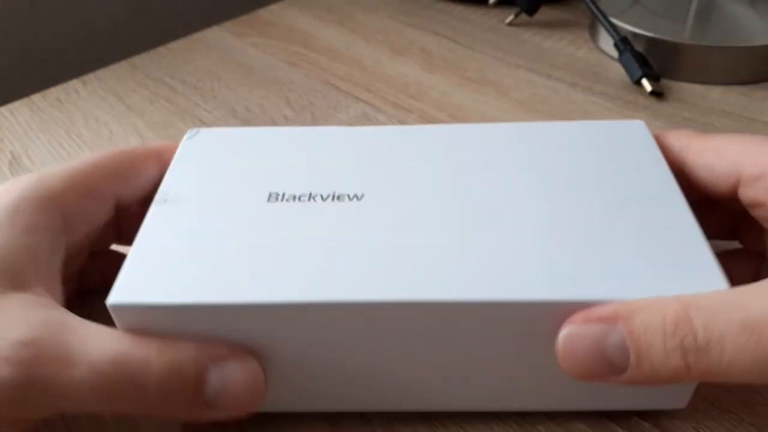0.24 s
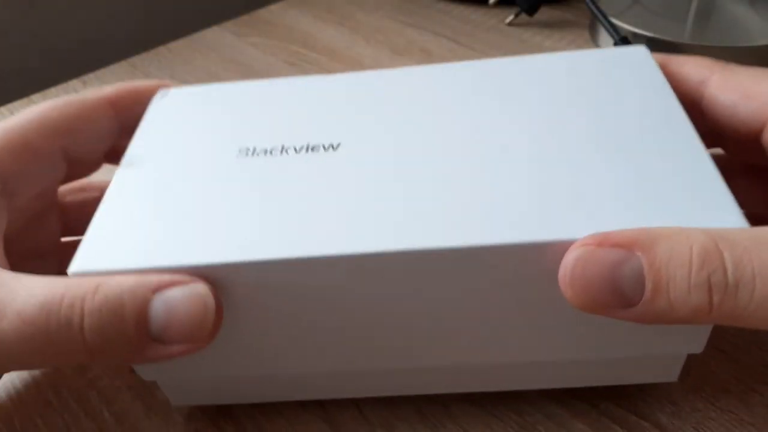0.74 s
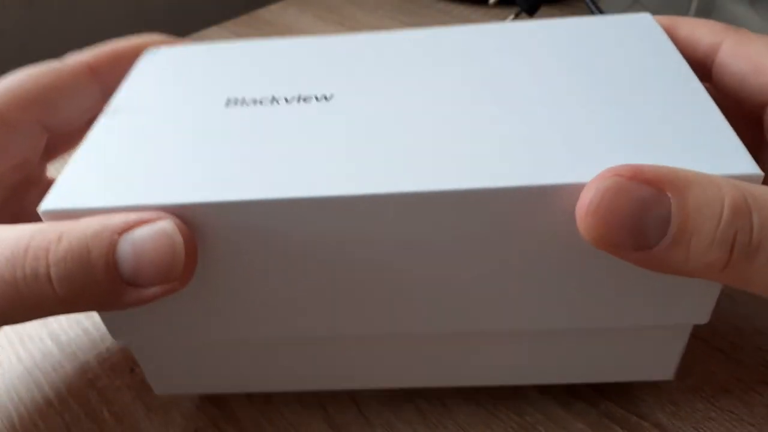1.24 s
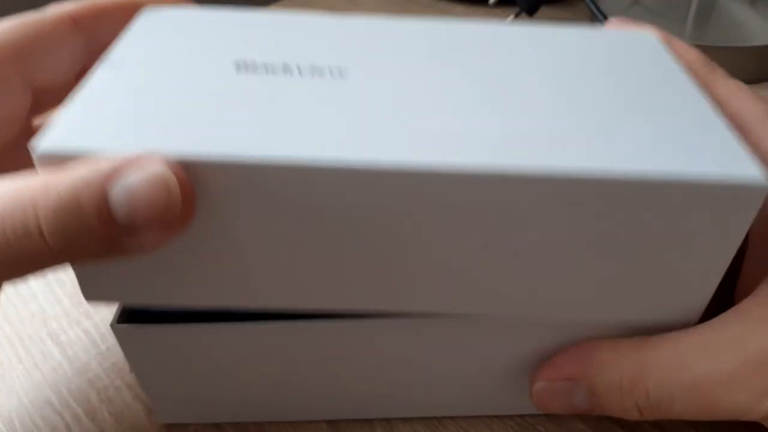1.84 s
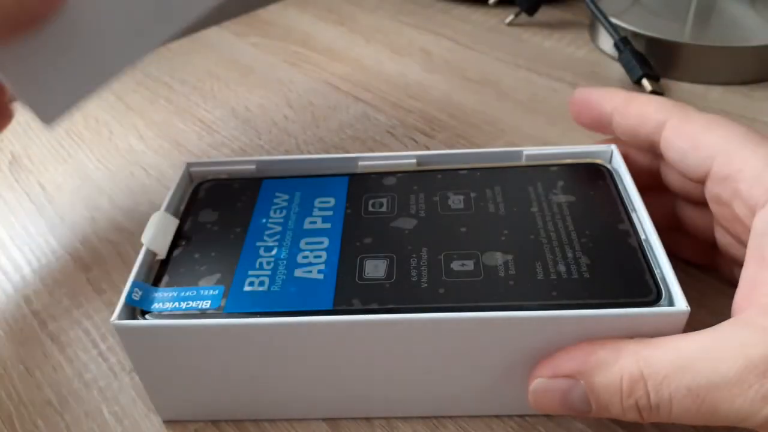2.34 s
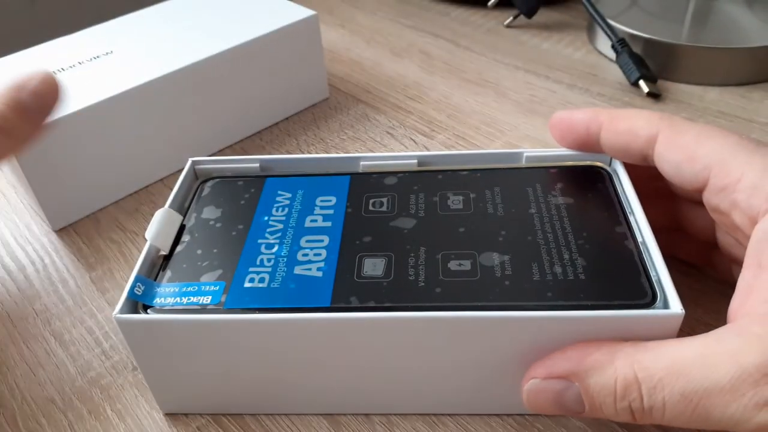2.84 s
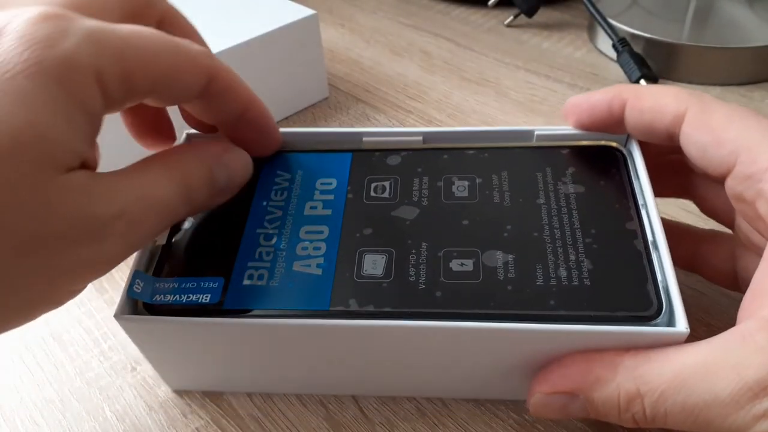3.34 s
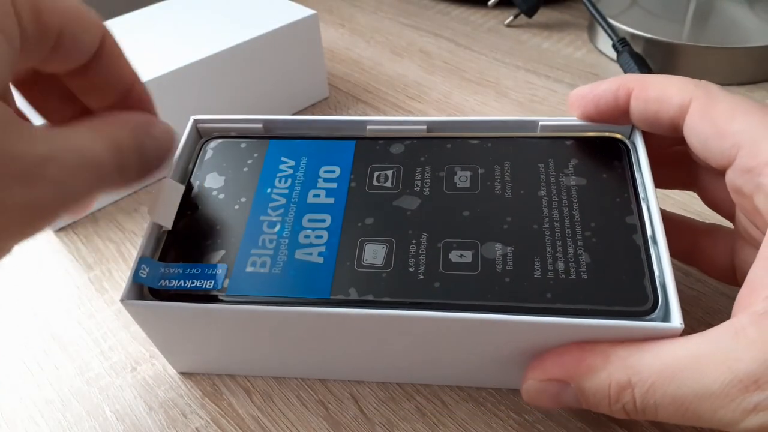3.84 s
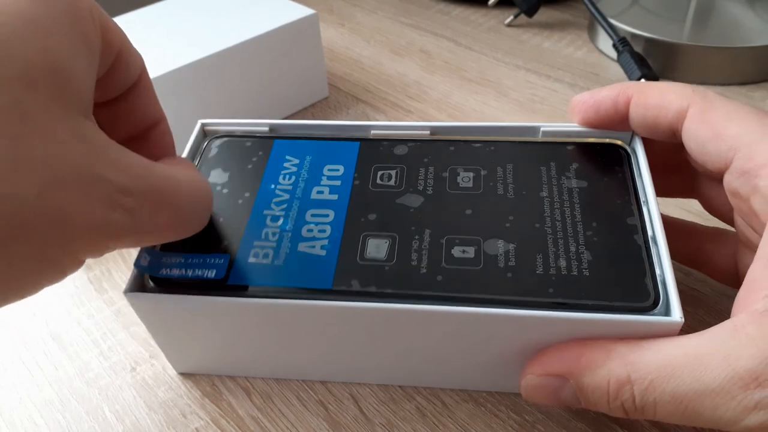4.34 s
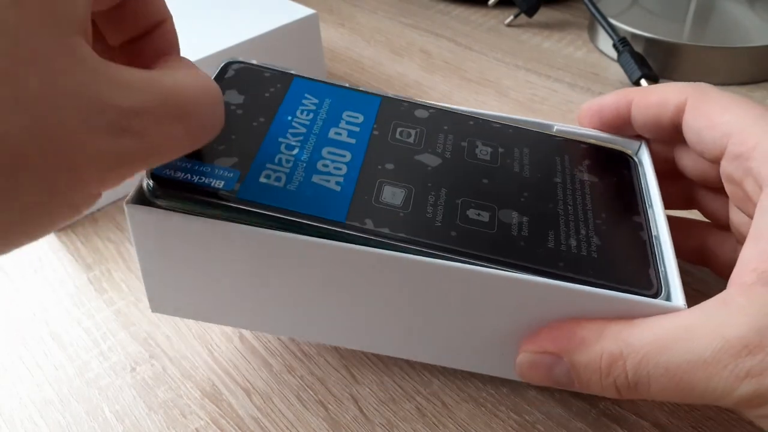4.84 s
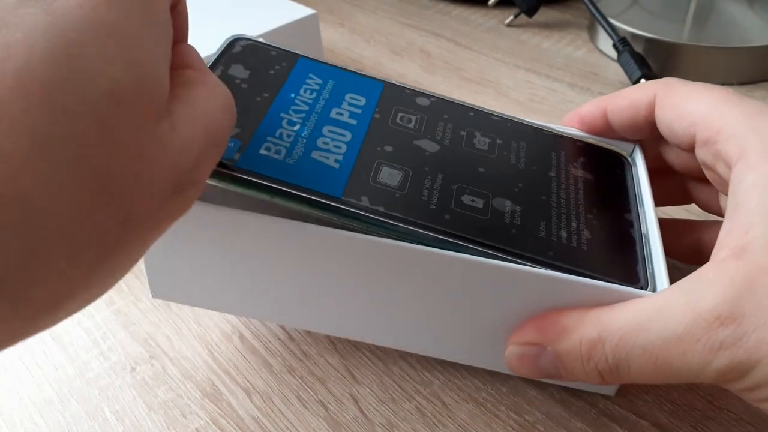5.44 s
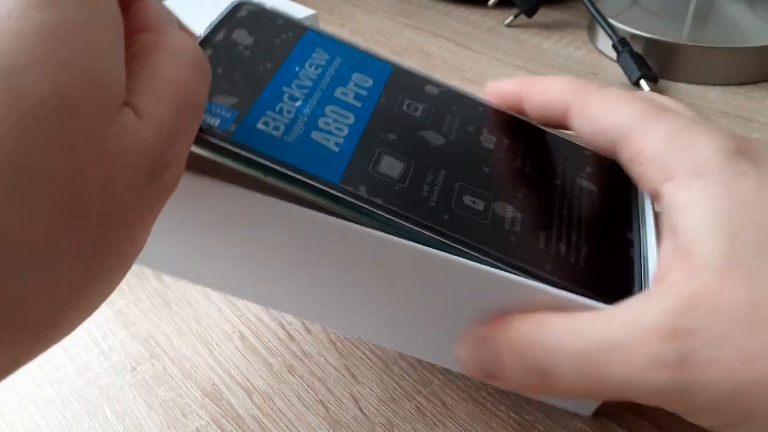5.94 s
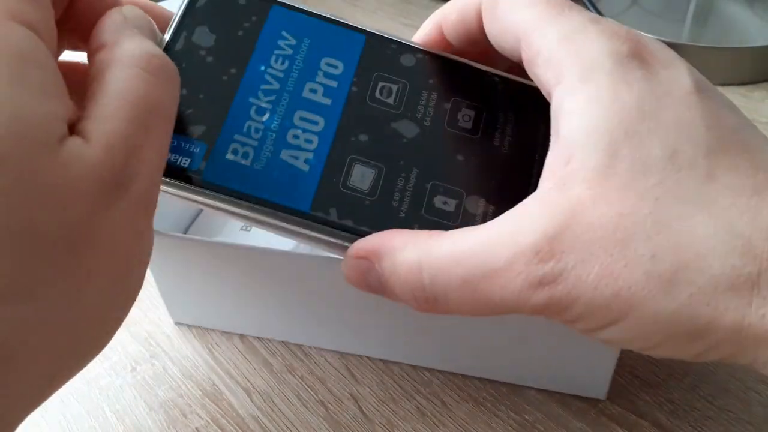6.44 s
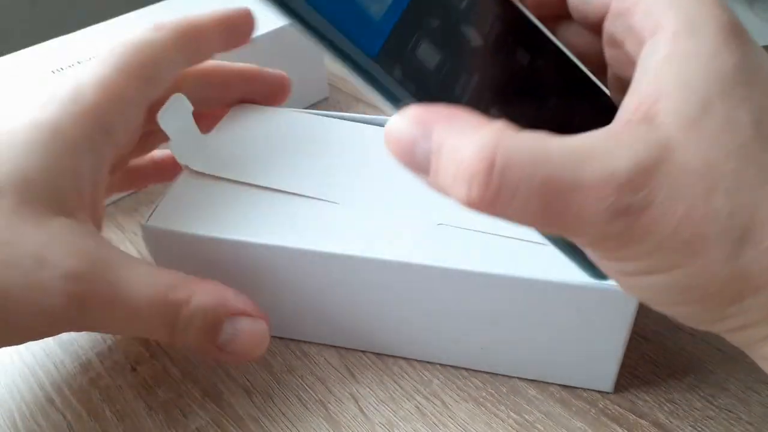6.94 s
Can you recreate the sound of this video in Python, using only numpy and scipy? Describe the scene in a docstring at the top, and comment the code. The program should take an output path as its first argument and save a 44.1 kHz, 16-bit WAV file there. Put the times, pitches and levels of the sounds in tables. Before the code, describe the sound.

A small quiet room with low murmur, slight hiss and a barely audible hum, heard very close. From 0 s, palms softly rub stiff card. Between 0.4 and 1.5 s the lid slides up in short, dry, uneven pulls with a small squeak. At 1.6 s the base drops onto the wooden desk with a boxy thump, followed by a brief scuff. At 2.47 s the lid lands slightly left with a loud hollow knock, chatters and settles by 2.6 s, a metal lamp foot ringing faintly. From 3 to 4.4 s fingertips brush film and pick at a tab, with a crisp snap at 3.2 s. From 4.5 s a phone scrapes lightly up the wall, with taps at 5.1 and 5.25 s. Grip rubs grow around 6 s; sharp scrapes at 6.25 s precede the loudest crack at 6.33 s as the box falls and skids. A smaller knock comes at 6.8 s, then faint rubbing.

```python
"""Over a quiet room murmur, palms rub a stiff cardboard box on a wooden desk, close to the microphone.
The lid drags upward, the base drops out onto the desk, and the lid is put down with a hollow knock.
Fingers pick at a pull tab, a phone scrapes up along the box wall, and the tilted box falls back.
Rubs and squeaks are random tiny slips through resonances; knocks, booms and taps are damped modes,
with noise for the crack of card; ticks are short band-limited noise. Reflections add a small room."""
import sys
import numpy as np
from scipy import signal
from scipy.fft import rfft, irfft, next_fast_len
from scipy.io import wavfile
from scipy.ndimage import uniform_filter1d

SR = 44100
rng = np.random.default_rng(int(sys.argv[2]) if len(sys.argv) > 2 else 0)


def dump_mix(stems):
    """Bounce the given channels to the path in sys.argv[1] as a 16-bit WAV at rate SR."""
    frames = np.atleast_2d(stems).T  # one column per channel
    limited = np.clip(frames, -1, 1)  # hard clip at full scale
    pcm = np.round(limited * 32767).astype(np.int16)
    wavfile.write(sys.argv[1], SR, pcm)


N = 316638
TIME = np.arange(N) / SR


def amp(db):
    """Decibels to gain."""
    return 10 ** (np.asarray(db) / 20)


def unit(x):
    """Scales to rms 1."""
    return x / np.sqrt(np.mean(x ** 2) + 1e-20)


def read(points, hz):
    """Reads a spectrum along a log-frequency axis."""
    f, value = np.transpose(points)
    return np.interp(np.log(hz + 1), np.log(f + 1), value)


def add(mix, start_s, sound):
    """Adds a stereo sound to the mix at its start time."""
    part = mix[:, max(round(start_s * SR), 0):][:, :sound.shape[1]]
    part += sound[:, :part.shape[1]]


def colour(x, spectrum, size=2048):
    """Causal filter with the given spectrum."""
    hz = abs(np.fft.fftfreq(size, 1 / SR))
    log_gain = np.log(amp(np.maximum(read(spectrum, hz), -100)))
    taps = np.fft.ifft(np.exp(np.conj(signal.hilbert(log_gain)))).real
    return signal.oaconvolve(x, taps[None], axes=1)[:, :x.shape[1]]


def resonate(x, hz, width_hz, db):
    """Lifts one resonance out of a sound."""
    return x + amp(db) * signal.lfilter(*signal.iirpeak(hz, hz / width_hz, SR), x)


# likeness of the two microphone ports: (frequency [Hz], likeness [0-1])
PORT_LIKENESS = [(50, 0.7), (300, .93), (700, 0.7), (1400, 0.2), (3000, 0), (16000, 0)]


def pair(x):
    """Two unrelated signals become alike in the bass, as at two close ports."""
    left, other = rfft(x)
    same = np.clip(read(PORT_LIKENESS, np.fft.rfftfreq(x.shape[1], 1 / SR)), 0, 1)
    right = same * left + np.sqrt(1 - same ** 2) * other
    return irfft(np.array([left, right]), x.shape[1])


def wander(per_s):
    """Slow random drift of rms 1, joining so many random points a second."""
    knots = rng.standard_normal(N // 64)
    return unit(np.interp(TIME * per_s, np.arange(len(knots)), knots))


def slips(per_s, spread_db):
    """Tiny catches of paper fibres: random clicks, a few of them large."""
    size = next_fast_len(N, True)
    heights = amp(spread_db * np.minimum(rng.exponential(1, size), 4))
    heights = heights * (rng.random(size) < per_s / SR)
    return pair(heights * rng.standard_normal((2, size)))[:, :N]


def ring(modes, pitch, contact_s, lag_s, t):
    """Damped modes, swelling while the contact lasts and reaching the right port later; peak 1."""
    t = np.maximum(t - np.array([[0], [lag_s]]), 0)
    x = sum(amp(db - 60 * t / t60) * np.sin(2 * np.pi * hz * pitch * t) for hz, db, t60 in modes)
    x = x * (1 - np.exp(-(t / contact_s) ** 2))
    return x / abs(x).max()


# relative spectrum of the still room and microphone hiss: (frequency [Hz], density [dB per Hz])
FLOOR = [(20, -21.5), (60, -6), (130, 1), (280, -0.5), (500, -10.5), (1200, -13), (2500, -17.5),
         (4200, -18.5), (7000, -24.5), (9500, -31.5), (11000, -18.5), (13000, -16.5), (16000, -14.5)]
# faint hum: (frequency [Hz], rms level [dB])
HUM = [(118.4, -75.5)]


def background(floor_db=-67):
    """Room murmur and microphone hiss are coloured noise; the faint hum is a steady sine."""
    noise = pair(rng.standard_normal((2, next_fast_len(N, True))))[:, :N]
    air = unit(colour(noise, FLOOR))
    hum = sum(amp(db) * np.sqrt(2) * np.sin(2 * np.pi * (hz * TIME + rng.random())) for hz, db in HUM)
    return amp(floor_db) * air + hum


def off_the_hand(x, delay_s=0.001097, drift=0.16, per_s=7, gain=0.4):
    """A reflection from the moving hand combs the rub with slowly shifting peaks."""
    heard_at = TIME - delay_s * (1 + drift * wander(per_s))
    echo = np.array([np.interp(heard_at, TIME, side, left=0) for side in x])
    return (x + gain * echo) / np.hypot(1, gain)


def snags(per_s=70, height=0.73, release_s=.0016):
    """Now and then an edge snags and lets go: a brief surge of drag and hiss together."""
    kicks = (rng.random(N) < per_s / SR) * rng.random(N)
    return 1 + height * signal.lfilter([1], [1, -np.exp(-1 / (release_s * SR))], kicks)


def stroke_gains(strokes, drag_power=0.15, rumble_power=0.49, hiss_power=0.75, ease_s=0.02):
    """Speed arches over each stroke: drag sets in almost at once, hiss needs speed and peaks midway."""
    power = np.zeros((3, N))
    for start, length, drag_db, rumble_db, hiss_db in strokes:
        a, b = np.searchsorted(TIME, [start, start + length])
        speed = abs(np.sin(np.pi * (TIME[a:b] - start) / length))
        drag = amp(drag_db) * speed ** drag_power
        rumble = amp(rumble_db) * speed ** rumble_power
        hiss = amp(hiss_db) * speed ** hiss_power
        power[:, a:b] += np.square([drag, rumble, hiss])
    # soft skin and card ease into and out of each stroke
    return uniform_filter1d(np.sqrt(power), max(round(ease_s * SR), 1), axis=1)


# Strokes, with levels before the speed arch and easing:
# drag of the surface, rumble of the held box, hiss of skin and paper
# palms take hold of the lid: (time [s], length [s], drag [dB], rumble [dB], hiss [dB])
PALM_RUBS = [(-.04, 0.16, -55, -55, -54), (.09, 0.12, -61.5, -54, -62), (.185, 0.08, -62.5, -56.5, -53.5),
             (.26, 0.16, -60.5, -57.5, -73)]
# the lid slides up in short pulls and last scuffs the desk:
# (time [s], length [s], drag [dB], rumble [dB], hiss [dB])
LID_SLIDES = [(.41, 0.096, -58.5, -56.5, -72), (.48, 0.087, -56.5, -63, -63.5), (.55, 0.1, -64, -63.5, -73),
              (.645, 0.08, -54.5, -54.5, -50.5), (.715, 0.051, -58, -55.5, -75),
              (.765, 0.12, -51.5, -59.5, -58.5), (.88, 0.07, -55, -59.5, -60.5),
              (.945, 0.052, -51.5, -53, -73), (.99, 0.15, -69.5, -65.5, -73),
              (1.15, 0.042, -58, -59.5, -73), (1.18, 0.11, -51.5, -65, -59), (1.28, .11, -55.5, -56.5, -73),
              (1.425, 0.1, -53.5, -62, -73), (1.48, 0.13, -52.5, -67, -60), (1.66, 0.15, -52.5, -53, -55.5),
              (1.752, 0.041, -47, -57, -49), (1.792, 0.06, -44, -45, -46.5), (1.84, 0.063, -70, -60.5, -53),
              (2.61, .12, -58, -55.5, -64)]
# a fingertip feels over the screen film: (time [s], length [s], drag [dB], rumble [dB], hiss [dB])
FILM_RUBS = [(3, 0.078, -64.5, -86, -73), (3.085, 0.15, -66, -67, -59), (3.215, 0.26, -58.5, -67, -75),
             (3.345, 0.077, -53.5, -73, -67.5), (3.415, 0.046, -59, -62, -64.5),
             (3.47, 0.176, -66, -62, -65.5), (3.588, 0.022, -50.5, -72, -52.5),
             (3.61, 0.049, -65.5, -54.5, -79)]
# fingers pull at the tab: (time [s], length [s], drag [dB], rumble [dB], hiss [dB])
TAB_RUBS = [(3.895, 0.24, -66, -75, -64), (4.105, 0.18, -61.5, -65, -75), (4.295, 0.063, -57, -61, -57),
            (4.35, 0.15, -64.5, -65.5, -75)]
# the phone scrapes up the box wall: (time [s], length [s], drag [dB], rumble [dB], hiss [dB])
PHONE_SLIDES = [(4.47, 0.41, -67, -67, -75), (4.738, 0.067, -50.5, -61.5, -53),
                (4.886, 0.039, -48.5, -56, -57), (4.93, 0.086, -57.5, -60.5, -65),
                (5.02, 0.039, -60.5, -57, -68), (5.09, 0.32, -62.5, -66, -69),
                (5.185, 0.021, -49.5, -60, -70), (5.28, 0.069, -45, -60, -54),
                (5.35, 0.26, -62, -66, -71.5), (5.52, 0.16, -62, -68.5, -80)]
# the hand shifts its grip on box and phone: (time [s], length [s], drag [dB], rumble [dB], hiss [dB])
GRIP_RUBS = [(5.71, 0.23, -68.5, -67.5, -68), (5.815, 0.09, -56, -61, -68), (5.87, 0.11, -48, -66, -53.5),
             (5.9, 0.14, -55, -61.5, -47), (6.03, 0.076, -47.5, -58, -55.5), (6.08, 0.1, -53, -61.5, -52.5),
             (6.16, 0.13, -60, -66.5, -57), (6.935, 0.11, -61, -72, -68.5),
             (7.11, 0.15, -66.5, -73.5, -57.5)]
# the phone is drawn out over the rim: (time [s], length [s], drag [dB], rumble [dB], hiss [dB])
PHONE_LIFTS = [(6.243, 0.024, -43, -55, -42), (6.276, 0.027, -42, -55, -35.5),
               (6.304, 0.037, -34, -48, -41), (6.44, 0.2, -56, -65, -66.5),
               (6.555, 0.057, -49.5, -61, -60.5), (6.615, 0.076, -46, -65, -61),
               (6.612, 0.026, -58, -63, -48.5), (6.695, 0.11, -50.5, -68, -71),
               (6.785, 0.06, -60, -54, -44.5)]
# the fallen box skids and crunches on the desk: (time [s], length [s], drag [dB], rumble [dB], hiss [dB])
BOX_SKIDS = [(6.35, 0.038, -30, -34.5, -48), (6.39, 0.041, -44, -44, -56.5)]
# relative drag colour of palms on card: (frequency [Hz], density [dB per Hz])
PALM_DRAG = [(200, -23), (320, 2), (600, -3), (1050, -10), (1350, -11.5), (2000, -15.5), (6000, -26),
             (8000, -31)]
# drag colour of the sliding lid: (frequency [Hz], density [dB per Hz])
LID_DRAG = [(180, -28.5), (300, -2), (367, -34), (437, 2.5), (576, -1), (653, 0), (927, -5), (1100, -10.5),
            (1510, -9.5), (1800, -16), (2260, -14), (6000, -28), (7800, -47.5), (13200, -120)]
# drag colour of the film: (frequency [Hz], density [dB per Hz])
FILM_DRAG = [(350, -9.5), (550, 2), (780, 0), (1200, -3), (1650, -7.5), (2800, -13.5), (4400, -11.5),
             (7000, -30.5)]
# drag colour of the tab: (frequency [Hz], density [dB per Hz])
TAB_DRAG = [(250, -26), (450, 8), (1100, 0.5), (1500, -4), (2500, -11.5), (3300, -15.5), (5500, -12),
            (8000, -21.5)]
# drag colour of the phone on the wall: (frequency [Hz], density [dB per Hz])
PHONE_DRAG = [(150, -20.5), (250, -18), (297, -3), (393, -3), (431, 0), (506, 0), (687, 0), (1180, -10),
              (1450, -5), (1890, -16.5), (2670, -16), (3010, -15.5), (6000, -25), (7800, -33),
              (13200, -120)]
# drag colour of the shifting grip: (frequency [Hz], density [dB per Hz])
GRIP_DRAG = [(250, -13.5), (450, 4.5), (750, 0), (1200, -5), (1600, -11), (2400, -9), (4400, -14),
             (8000, -29.5)]
# drag colour of the phone on the rim: (frequency [Hz], density [dB per Hz])
LIFT_DRAG = [(300, -30), (500, -12), (640, 1.5), (920, -1), (1200, -8), (1500, -5.5), (2400, -16.5),
             (4400, -15), (7500, -53)]
# drag colour of the skid: (frequency [Hz], density [dB per Hz])
SKID_DRAG = [(200, -10), (400, -5.5), (1100, 4), (2300, -4), (3400, -16.5), (9000, -35.5)]
# rumble colour of the hollow box: (frequency [Hz], density [dB per Hz])
RUMBLE = [(25, -21.5), (60, -12), (110, -7.5), (200, -1), (310, -2), (420, -3), (700, -44.5)]
# hiss colour of the fibres before each contact's tilt: (frequency [Hz], density [dB per Hz])
HISS = [(1200, -3.5), (2500, -1.5), (4500, 2), (6000, -0.5), (8000, 2), (9300, -8.5), (11500, -2.5),
        (16000, -11)]


def friction(judder_db=1.05):
    """Surfaces catch and slip: panels sound the drag, the hollow box rumbles, fibres hiss and rasp."""
    # strokes, colour, hiss tilt [dB per octave], then resonances (centre [Hz], width [Hz], lift [dB])
    # of the rubbed surface, the box as it is held, the rasp of the fibres
    contacts = [
        (PALM_RUBS, PALM_DRAG, .8, (1290, 110, -1), (316, 24, 0.0), (2980, 1500, -29)),
        (LID_SLIDES, LID_DRAG, .2, (810, 163, -19.5), (123, 83, 0.5), (2800, 1200, -2.5)),
        (FILM_RUBS, FILM_DRAG, .2, (1647, 1100, 4.5), (242, 42, 0.5), (8700, 1600, -14)),
        (TAB_RUBS, TAB_DRAG, -.8, (1119, 106, -7), (337, 138, -13), (3700, 400, 7.0)),
        (PHONE_SLIDES, PHONE_DRAG, -1.5, (430, 55, 0.0), (320, 33, 3.5), (6260, 920, -10)),
        (GRIP_RUBS, GRIP_DRAG, 1.6, (1484, 140, 7.0), (120, 14, 14.5), (14000, 2700, -18.0)),
        (PHONE_LIFTS, LIFT_DRAG, -.6, (790, 80, -13.0), (116, 8.9, 19.0), (7470, 1200, -17)),
        (BOX_SKIDS, SKID_DRAG, -1.0, (1700, 150, -4.0), (350, 60, -11), (3000, 900, -2.5))]
    surge = snags()
    catches = off_the_hand(slips(per_s=3200, spread_db=0.5)) * amp(judder_db * wander(90)) * surge
    shudder = colour(slips(per_s=1800, spread_db=1.0), RUMBLE)
    fibres = slips(per_s=27000, spread_db=0.5) * surge
    out = np.zeros((2, N))
    for strokes, surface, tilt_db, panel, hollow, rasp in contacts:
        tilted = [(hz, db + tilt_db * np.log2(hz)) for hz, db in HISS]
        drag_gain, rumble_gain, hiss_gain = stroke_gains(strokes)
        out += drag_gain * unit(resonate(colour(catches, surface), *panel))
        out += rumble_gain * unit(resonate(shudder, *hollow))
        out += hiss_gain * unit(resonate(colour(fibres, tilted), *rasp))
    return out


# card sticks and slips fast enough to squeak, level before the swell:
# (time [s], length [s], level [dB], centre frequency [Hz])
SQUEAKS = [(0.029, 0.049, -56.5, 1395), (0.511, 0.035, -51, 795), (2.644, 0.068, -51, 466),
           (3.133, 0.037, -53, 872), (3.33, 0.11, -56, 1710), (3.41, .05, -64, 4580),
           (3.9, 0.26, -73.5, 3740), (4.115, 0.24, -70, 3670), (5.865, .24, -55, 1510),
           (6.286, 0.034, -38, 766), (6.564, 0.19, -63, 793)]


def squeaks(sharpness=16, swell=.5, drift=.014):
    """Rapid slips feed one narrow resonance of the card, whose pitch wavers with the pressure."""
    drive = slips(per_s=3100, spread_db=4.5) * amp(4.7 * wander(45))
    speed = 1 + drift * wander(35)
    out = np.zeros((2, N))
    for start, length, db, hz in SQUEAKS:
        a, b = np.searchsorted(TIME, [start, start + length])
        peak = signal.iirpeak(hz, sharpness, SR)
        tone = signal.lfilter(*peak, signal.lfilter(*peak, drive[:, a:b]))
        play_at = np.cumsum(speed[a:b])  # uneven playback bends the pitch
        tone = np.array([np.interp(play_at, np.arange(b - a), side, right=0) for side in tone])
        arch = abs(np.sin(np.pi * (TIME[a:b] - start) / length)) ** swell
        add(out, start, amp(db) * unit(tone) * arch)
    return out


# the desk top booms when the base of the box lands on it: (time [s], peak level [dB])
DESK_THUMPS = [(0.299, -48), (1.622, -24), (1.672, -51), (1.755, -40.5), (6.333, -37.5), (6.346, -27),
               (6.381, -35), (6.431, -45), (6.811, -47)]
# modes of the desk top: (frequency [Hz], relative level [dB], 60 dB decay [s])
DESK_TOP = [(83.6, -7, 0.05), (101, -8.5, 0.19), (113, 7.5, 0.065)]


def desk(contact_s=0.0054):
    """Low damped modes of the desk top boom under the blows."""
    boom = ring(DESK_TOP, 1.0, contact_s, 0, TIME[:SR // 3])
    out = np.zeros((2, N))
    for start, db in DESK_THUMPS:
        add(out, start, amp(db) * boom)
    return out


# crack of card before each blow's pitch: (frequency [Hz], relative density [dB per Hz])
CRACK = [(400, -5), (1200, 3.5), (2200, 0.5), (3300, -3), (5500, -11.5), (7800, -17), (9300, -26.5),
         (11500, -26.5), (16000, -37.5)]


def knocks(rows, panels, air, contact_s, thud_s, lag_s, crack_s, crush_db, crush_s):
    """Each blow rings the panels, thumps the air inside, and cracks where the edge meets."""
    out, t = np.zeros((2, N)), np.arange(SR // 3) / SR
    for start, ring_db, thud_db, crack_db, pitch in rows:
        decay = np.exp(-t / crack_s) + amp(crush_db) * np.exp(-t / crush_s)
        fibres = pair(rng.standard_normal((2, len(t)))) * decay
        fibres = fibres * (1 - np.exp(-t / 0.00085))  # card gives a little before it cracks
        crack = colour(fibres, [(hz * pitch, db) for hz, db in CRACK])
        crack = crack / np.linalg.norm(crack) * 2.9  # same energy before its level
        panel_ring = amp(ring_db) * ring(panels, pitch, contact_s, lag_s, t)
        air_thud = amp(thud_db) * ring(air, pitch ** .2, thud_s, lag_s, t)  # air shifts less in pitch
        add(out, start, panel_ring + amp(crack_db) * crack + air_thud)
    return out


# blows on the base: (time [s], ring level [dB], thud level [dB], crack level [dB], pitch [factor])
BOX_KNOCKS = [(.398, -44.5, -58, -52, 0.99), (1.293, -38, -54, -35, 0.72), (1.5898, -13, -23.5, -28, 1.044),
              (1.5935, -27.5, -54, -22.5, 1.73), (1.620, -28.5, -25.5, -17.5, 1.56),
              (1.624, -23.5, -23, -36.5, 0.97), (1.755, -34, -41, -34, 0.69),
              (1.766, -29.5, -37.5, -51, 0.68), (3.182, -34.5, -31.5, -27, 0.57),
              (3.204, -35.5, -33, -23.5, 1.02), (3.593, -55, -60, -35, 0.84),
              (4.889, -41.5, -60, -58.5, 0.68), (5.142, -49, -59.5, -47.5, 1.03),
              (5.188, -42, -48.5, -54.5, 0.9), (5.263, -31.5, -47.5, -22.5, 0.97),
              (6.094, -35.5, -52.5, -37, 0.87), (6.238, -19.5, -29, -26.5, 0.91),
              (6.286, -24, -36.5, -33, 1.03), (6.3338, -2, -24.5, -4, 1.125),
              (6.357, -26, -40.5, -21.5, 1.15), (6.786, -32.5, -48, -33, 1.06),
              (6.812, -21.5, -31.5, -16, 0.81), (6.822, -28, -61, -23, 1.14), (6.875, -43, -67, -43, 1.1)]
# panels of the base before pitch: (frequency [Hz], relative level [dB], 60 dB decay [s])
BOX_PANELS = [(564, -9.5, 0.048), (670, -2, 0.027), (746, 5, 0.021), (830, 8.5, 0.012), (970, -29, 0.084),
              (1141, -16, 0.024), (1420, -18, 0.024), (1713, -26, 0.043), (2280, -30, 0.012),
              (2330, -30.5, 0.023), (2755, -31, 0.02)]
# air in the base before pitch: (frequency [Hz], relative level [dB], 60 dB decay [s])
BOX_AIR = [(191, 0.5, 0.065), (209, -4, 0.16), (337, 12, 0.042)]


def box_knocks():
    """Blows on the base of the box excite short panel modes, an air thud and a crack."""
    return knocks(BOX_KNOCKS, BOX_PANELS, BOX_AIR, contact_s=0.0023, thud_s=0.0041, lag_s=.00009,
                  crack_s=0.0011, crush_db=-2.0, crush_s=0.011)


# short ticks and snaps of edges that catch and let go: (time [s], peak level [dB], centre [Hz])
TICKS = [(1.268, -55, 9000), (1.294, -47, 11600), (1.294, -40, 1400), (1.59, -39, 13100),
         (1.625, -44, 12000), (2.579, -31.5, 3380), (2.762, -47, 1700), (2.861, -34, 14040),
         (3.2038, -22, 5240), (3.2038, -32, 3530), (3.203, -47, 12500), (5.266, -28, 1670),
         (5.267, -34, 5800), (6.3234, -26.5, 5000), (6.334, -8, 2280), (6.334, -27, 11930),
         (6.363, -21.5, 2210), (6.381, -25, 2100), (6.411, -39, 2000), (6.472, -46, 5200),
         (6.619, -37, 5000), (6.99, -43, 1600)]


def ticks(decay_s=0.0023, skirt_db=-17):
    """Short snaps of card and film, each decaying noise in a broad band of its own."""
    out, t = np.zeros((2, N)), np.arange(SR // 20) / SR
    for start, db, hz in TICKS:
        band = [(hz / 4, 2 * skirt_db), (hz / 2, skirt_db), (hz / 1.12, 0),
                (hz * 1.1, 0), (hz * 2, skirt_db), (hz * 4, 2 * skirt_db)]
        snap = colour(rng.standard_normal((2, len(t))) * np.exp(-t / decay_s), band)
        add(out, start, amp(db) * snap / abs(snap).max())
    return out


def chatter(rows, count=4, gap_s=0.0099, first_db=-14, loss_db=4.5, detune=0.14):
    """After each blow the loose walls slap a few more times, weaker and at ever different spots."""
    out = list(rows)
    for start, ring_db, thud_db, crack_db, pitch in rows:
        gaps, spots = rng.random((2, count))
        delays = np.cumsum(gap_s * (.5 + gaps))
        for k, (delay, spot) in enumerate(zip(delays, spots)):
            drop = first_db - loss_db * k
            slap_pitch = pitch * (1 + detune * (2 * spot - 1))
            out.append((start + delay, ring_db + drop, thud_db + 2 * drop, crack_db + drop, slap_pitch))
    return out


# the lid lands on one edge, chatters, then drops flat, before the left-right balance:
# (time [s], ring level [dB], thud level [dB], crack level [dB], pitch [factor])
LID_KNOCKS = [(2.4682, -3.5, -18.5, -9.5, 0.99), (2.4716, -13, -25.5, -18, 1.07),
              (2.4815, -18.5, -38, -23, 0.79), (2.514, -22, -34, -25, 0.9), (2.573, -15.5, -33, -16, 0.48),
              (2.5785, -22, -46, -24, 0.85), (2.5805, -17.5, -42, -21, 0.67)]
# panels of the lid before pitch: (frequency [Hz], relative level [dB], 60 dB decay [s])
LID_PANELS = [(446.2, -25, 0.24), (520, -3, 0.026), (637, 0, 0.04), (770, -9.5, 0.049), (876, -0.5, 0.047),
              (972, -9.5, 0.074), (1109, -16, 0.09), (1204, -8.5, 0.079), (1390, 2, 0.031),
              (1514, -11.5, 0.067), (1723, -11.5, 0.04), (1995, -11, 0.062), (2218, -8, 0.054),
              (2342, -15, 0.043), (2920, -17.5, 0.04), (3287, -21, 0.042), (3810, -29, 0.015)]
# air under the lid before pitch: (frequency [Hz], relative level [dB], 60 dB decay [s])
LID_AIR = [(189, 9, 0.088), (233.2, -8.5, 0.46), (309.8, 0, 0.4), (383, -4.5, 0.1)]


def lid_knocks():
    """Panels and air of the lid ring long and hollow, to the left: later and softer at the right port."""
    lid = knocks(chatter(LID_KNOCKS), LID_PANELS, LID_AIR, contact_s=0.0019, thud_s=0.0043,
                 lag_s=0.00018, crack_s=0.0015, crush_db=-8.0, crush_s=0.015)
    lid = signal.lfilter(*signal.butter(2, 150, "high", fs=SR), lid)  # too small to radiate deep bass
    return lid * amp([[1], [-1]])  # left and right, dB


# hard blows on the desk set a metal lamp foot ringing faintly: (time [s], peak level [dB])
LAMP_RINGS = [(2.472, -27.5), (6.336, -29)]
# modes of the lamp foot before its pitch factor: (frequency [Hz], relative level [dB], 60 dB decay [s])
LAMP_FOOT = [(666, -3, 0.32), (790, -3.5, 0.46), (1217, -1, 0.24), (1560, -4.5, .27), (2360, -7, .3)]


def lamp(contact_s=.003, lag_s=0.00024):
    """The metal foot's slowly damped modes ring on after the card has gone quiet."""
    chime = ring(LAMP_FOOT, 0.99, contact_s, lag_s, TIME[:SR // 2])
    out = np.zeros((2, N))
    for start, db in LAMP_RINGS:
        add(out, start, amp(db) * chime)
    return out


# the phone clicks against the box wall or under a fingernail:
# (time [s], peak level [dB], pitch [factor])
PHONE_TAPS = [(3.343, -42, 1.04), (5.085, -36.5, 1), (5.25, -45, 1.03), (5.8645, -36, 1.07),
              (6.7345, -34.5, 1.01)]
# modes of the phone before pitch: (frequency [Hz], relative level [dB], 60 dB decay [s])
PHONE_BODY = [(315, -2.5, 0.053), (700, -7, .025), (1370, 0, .03), (3480, -2, .017), (4600, -8, .014)]


def phone_taps(contact_s=.0005, lag_s=.00009):
    """The stiff phone answers with a short, clear clack of damped modes."""
    out = np.zeros((2, N))
    for start, db, pitch in PHONE_TAPS:
        add(out, start, amp(db) * ring(PHONE_BODY, pitch, contact_s, lag_s, TIME[:SR // 10]))
    return out


# reflections from desk, wall and lamp, a list for left and one for right: (delay [s], gain [factor])
ECHOES = [
    [(.0031, 0.035), (.0066, 0.082), (.0089, 0.033), (.0137, 0.077)],
    [(.0024, -0.073), (.0052, -.17), (.0083, 0.14), (.0131, .16)],
]
# decay of the room: (frequency [Hz], 60 dB decay [s])
ROOM_T60 = [(100, 0.1), (300, 0.28), (800, 0.25), (2000, 0.24), (5000, 0.23), (14000, 0.14)]
# strength of the tail before the wet level: (frequency [Hz], level [dB])
ROOM_GAIN = [(80, -5), (300, -2.5), (700, -12.5), (1500, -6), (3000, -7), (8000, -8.5), (15000, -5)]


def room(x, wet_db, build_s=0.0032):
    """A few near reflections, then a short diffuse tail that dies band by band."""
    size = SR // 2
    hz, t, tail = signal.stft(pair(rng.standard_normal((2, size))), SR, nperseg=256)
    t60 = read(ROOM_T60, hz)[:, None]
    level_db = wet_db + read(ROOM_GAIN, hz)[:, None] - 60 * t / t60
    tail = tail * amp(level_db) * np.sqrt(2 * np.log(1000) / (t60 * SR))  # evens out the decay times
    build = 1 - np.exp(-(TIME[:size] / build_s) ** 2)
    response = signal.istft(tail, SR, nperseg=256)[1][:, :size] * build
    for side, echoes in zip(response, ECHOES):
        for delay, gain in echoes:
            side[round(delay * SR)] += gain
    return x + signal.oaconvolve(x, response, axes=1)[:, :N]


def scene():
    """The box is handled close by and the lid lands to the left; lamp and background bypass the room."""
    handling = room(friction() + squeaks() + desk() + box_knocks(), wet_db=-1.0)
    clicks = room(ticks() + phone_taps(), wet_db=-4)
    lid = room(lid_knocks(), wet_db=-1.0)
    return handling + clicks + lid + lamp() + background()


def record(dry):
    """The microphone sheds deep bass, its right port has its own colour; full scale clips; then a band limit."""
    sound = signal.lfilter(*signal.butter(3, 56, "high", fs=SR), dry)
    # right port: (frequency [Hz], gain [dB])
    right = colour(sound[1:], [(100, -3.0), (1000, -3.0), (4000, -3.0), (9000, -1.0), (15000, 2.0)])
    clipped = np.clip(np.vstack([sound[:1], right]), -1, 1)
    band_limit = signal.firwin(511, 16000, window=("kaiser", 9), fs=SR)  # cutoff in Hz
    return signal.oaconvolve(clipped, band_limit[None], "same")


dry = scene()
out = record(dry)
dump_mix(out)
```